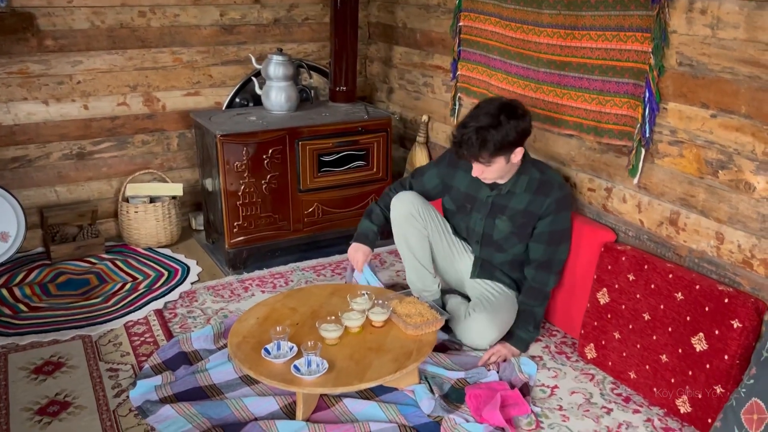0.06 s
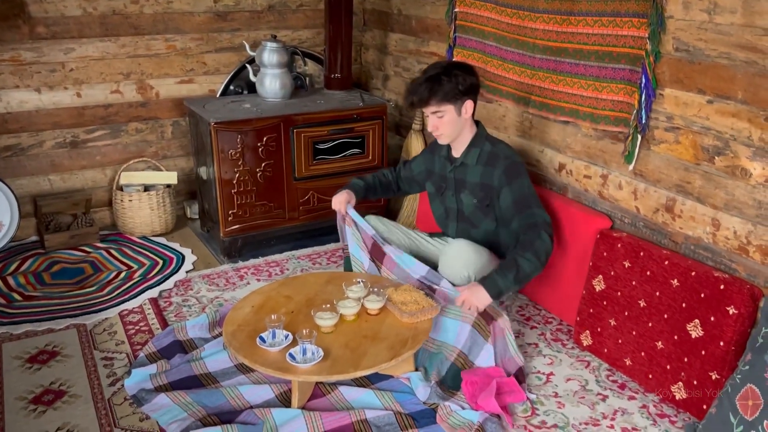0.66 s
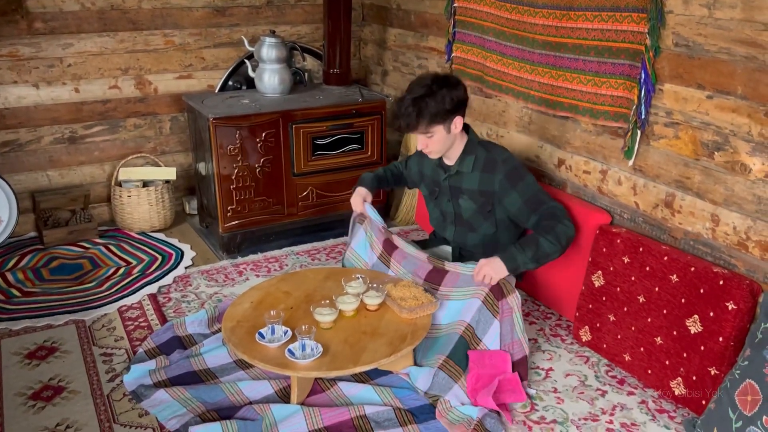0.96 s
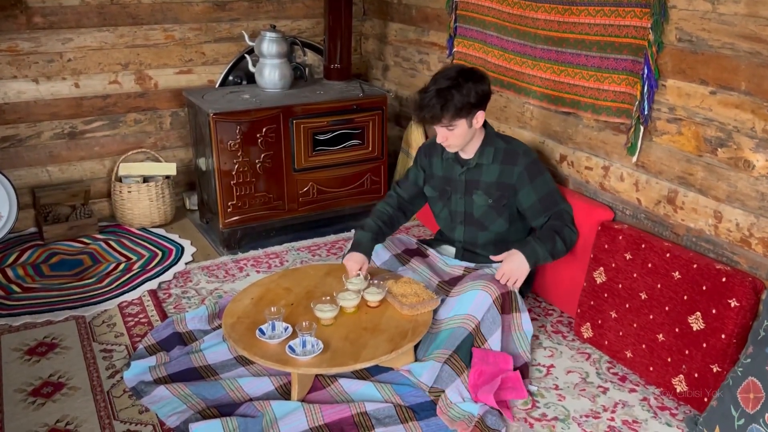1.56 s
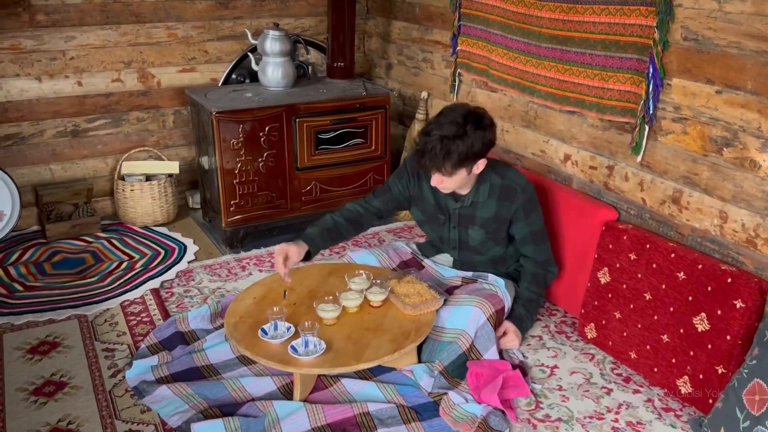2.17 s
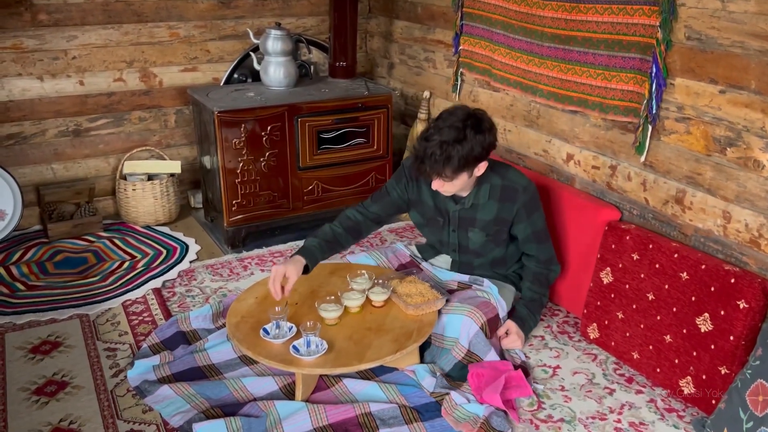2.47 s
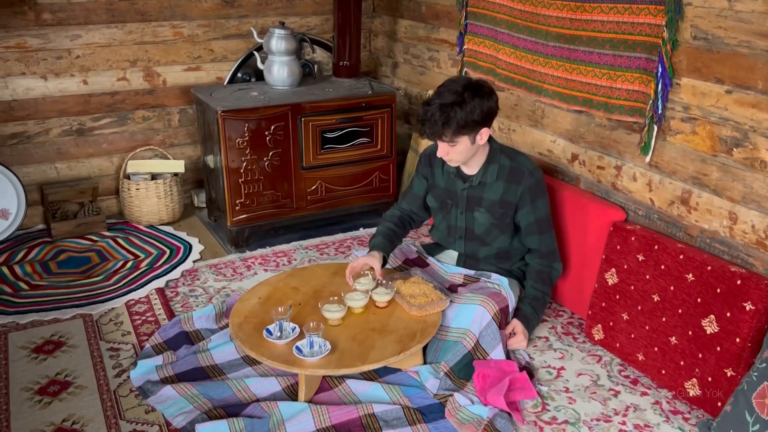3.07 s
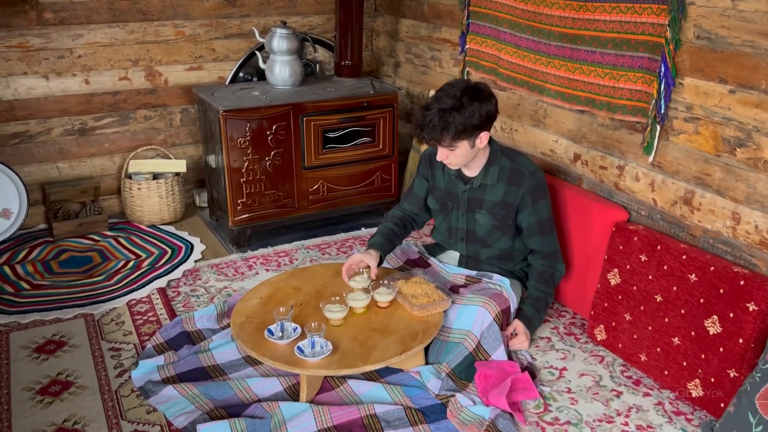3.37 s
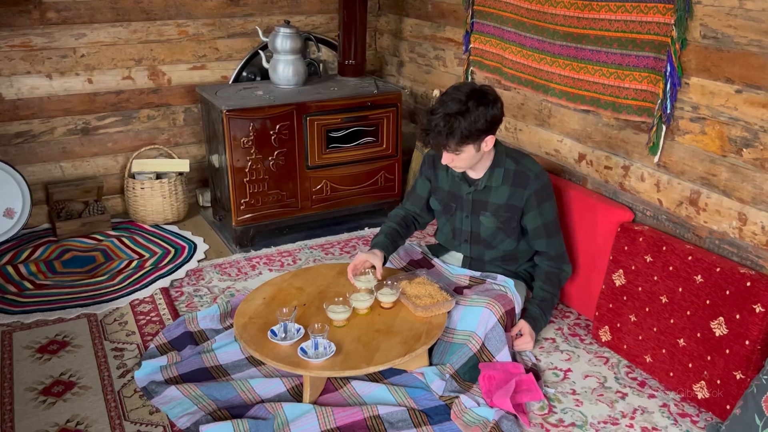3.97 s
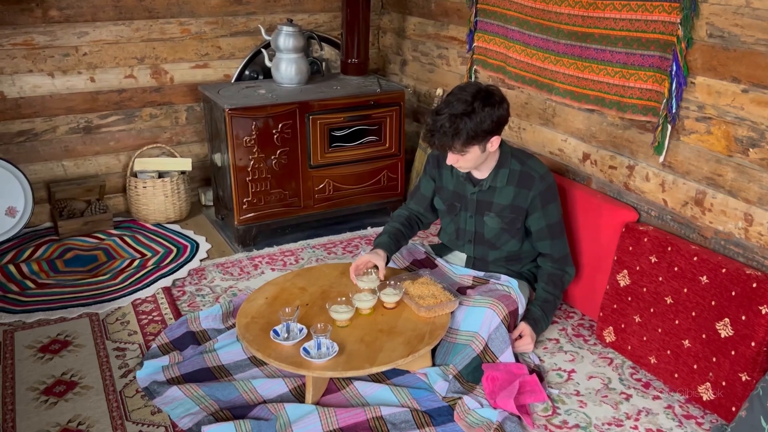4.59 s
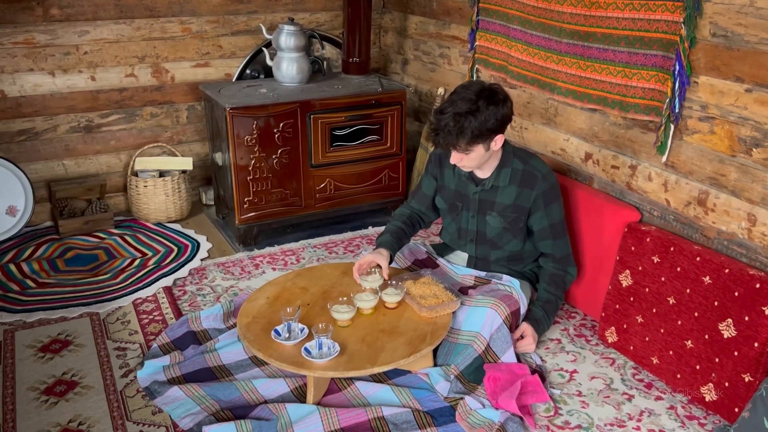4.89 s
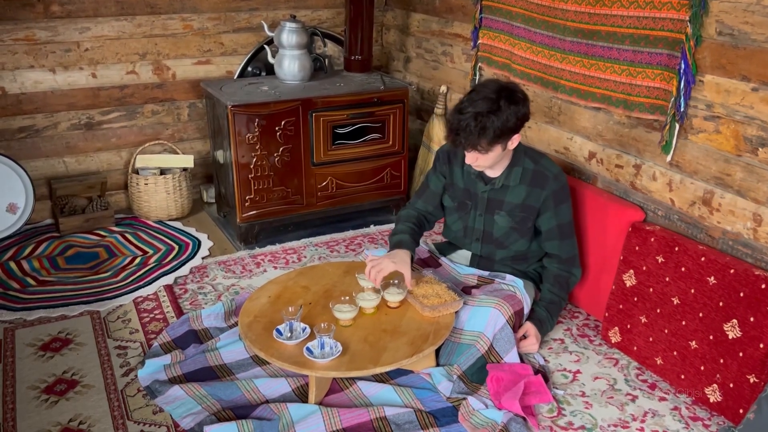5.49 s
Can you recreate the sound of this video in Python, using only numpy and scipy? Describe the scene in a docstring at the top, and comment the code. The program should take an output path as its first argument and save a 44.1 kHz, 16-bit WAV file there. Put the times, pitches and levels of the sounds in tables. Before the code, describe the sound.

A cloth is drawn up with a soft rustle and low rumble, and fingertips scuff a wooden table. A thin glass rattles briefly on a saucer and settles. Light bumps lead into four sharp, evenly spaced knocks on the tabletop, the loudest sounds, each with a hollow wooden ring and a tiny jingle of glass. It is heard through a phone a few metres off in a small, quiet timber room.

```python
"""Tea glass and knocks on a low table

In a carpeted timber room someone draws a cloth over his knees and reaches out, sleeve and fingers
rubbing on the wood. A tea glass lands on its saucer, hops and rocks to rest. Something small and hard
is nudged, then knocked four times on the table: each knock rings the top and sets the glassware
chattering. All is heard through a phone's two microphone ports, a few metres away."""
import sys
import numpy as np
from scipy import signal
from scipy.fft import rfft, irfft, next_fast_len
from scipy.io import wavfile

SR = 44100
rng = np.random.default_rng(int(sys.argv[2]) if len(sys.argv) > 2 else 0)


def to_wav(s):
    """Save 16-bit WAV."""
    ch = np.atleast_2d(s).T  # columns
    pcm = np.round(np.clip(ch, -1, 1) * 32767)  # PCM
    wavfile.write(sys.argv[1], SR, pcm.astype(np.int16))


N = 244314
TIME = np.arange(N) / SR
AGE = np.arange(SR // 3) / SR   # seconds since a contact

# blows on the table: t/s, level/dB, contact cut-off/Hz, f the spot favours/Hz, its boost/dB, click/dB
BLOWS = [(2.195, -38.5, 1250, 700, -1, -15), (3.076, -40, 520, 432, 5, -24),
         (3.269, -32.5, 920, 880, -2.5, -19), (3.362, -26.5, 1100, 890, 3, -24),
         (3.566, -35.5, 846, 430, 14, -31), (3.643, -39, 1690, 900, 3, -11),
         (3.748, -35, 900, 415, 14, -18.5), (3.958, -30.5, 2250, 1600, 8, -11),
         (3.9682, -2, 2460, 1600, -0.5, -8), (4.1412, -3, 2620, 789, 4.5, -11),
         (4.3024, -2, 2900, 2150, 0, -11), (4.455, -6.5, 1008, 865, 0, -18.5),
         (4.871, -35.5, 1300, 636, 2.5, -17)]
# hops of the glass on its saucer: t/s, glass/dB, saucer/dB, glass tilt/(dB per octave), crack/dB
HOPS = [(2.450, 2.5, -4, 7, -26), (2.49, 1, -8, 2.5, -23.5), (2.519, 4, -35, 7.5, -34),
        (2.531, -3, -6, 7, -39), (2.569, 0.5, -6, 3.5, -36), (2.621, -5, -18, 7, -44),
        (2.64, -3, -23, -4, -45.5), (2.663, -6.5, -24, -7, -42.5), (2.707, -6, -18, -2, -42),
        (2.755, -13, -22, -1, -44)]
# modes of the table top: f/Hz, level/dB, t60/s, lead of the left side/rad
TOP_MODES = [(274, -4, 0.17, 0.2), (307, -12, 0.14, 0.1), (395, -5, 0.12, 0.2), (430, -3, 0.15, -0.1),
             (733, -0.5, 0.17, -0.2), (778, -2, 0.14, -0.1), (832, 1.5, 0.21, 0.1), (883, -1.5, 0.24, 0.3),
             (985, -4, 0.16, -1), (1023, 0, 0.15, 0.8), (1085, 0, 0.18, 0.7), (1225, -7, 0.17, 2),
             (1311, -1, 0.19, 2), (1406, 0.5, 0.15, -0.9), (1540, -6, 0.15, 0), (1629, -2, 0.16, -1.5),
             (1720, -2.5, 0.14, 0.3), (2300, -11, 0.13, 0), (2755, -11, 0.15, 0.7), (3145, -4, 0.15, 0.6)]
# how alike diffuse sound is at the two ports: f/Hz, correlation
COHERENCE = [(60, 1), (300, 0.85), (650, 0.49), (1300, 0.017), (2500, 0.8), (5000, 0.34), (7000, 0.89),
             (15000, 1)]


def from_db(db):
    """Decibels to gain."""
    return 10 ** (np.asarray(db) / 20)


def rms_one(x):
    """Scale to rms 1."""
    return x / np.sqrt(np.mean(x ** 2) + 1e-20)


def at_hz(points, hz):
    """Read a table on a log-frequency axis."""
    knots, values = np.transpose(points)
    return np.interp(np.log(np.maximum(hz, 1)), np.log(knots), values)


def add(track, s, sound):
    """Mix a sound into a track at time s."""
    start = int(s * SR)
    track[..., start:start + sound.shape[-1]] += sound[..., :N - start]


def drift(rate_hz):
    """A random wander of spread about 1."""
    knots = rng.standard_normal(2000)
    return np.interp(TIME * rate_hz, np.arange(len(knots)), knots)


def dying(t60):
    """Exponential decay that loses 60 dB in t60 seconds."""
    return from_db(-60 * AGE / t60)


def soften(x, cut_hz, order=4):
    """A soft contact excites little above its cut-off."""
    return signal.sosfilt(signal.butter(order, cut_hz, fs=SR, output="sos"), x)


def diffuse(colour_db, size=len(AGE)):
    """Stereo noise of rms 1 as the two ports hear it, coloured by a function of Hz."""
    hz = np.fft.rfftfreq(size, 1 / SR)
    alike = np.clip(at_hz(COHERENCE, hz), -.99, .99)
    mid, side = rfft(rng.standard_normal((2, size)))
    pair = np.sqrt(1 + alike) * mid + np.sqrt(1 - alike) * side * [[1], [-1]]
    return rms_one(irfft(pair * from_db(colour_db(hz)), size))


def steady(spectrum):
    """A bed of diffuse noise as long as the scene."""
    return diffuse(lambda hz: at_hz(spectrum, hz), size=next_fast_len(N))[:, :N]


def swelling(hz, db, t60, rise_s):
    """A mode that takes a moment to build up, as a complex tone."""
    swell = (1 - np.exp(-(AGE / rise_s) ** 3)) * from_db(30 * rise_s / t60)
    return from_db(db) * swell * dying(t60) * np.exp(2j * np.pi * hz * AGE)


def beating(hz, spread_hz=15):
    """A close neighbour beats against a mode; the ports agree on the beat where they are coherent."""
    apart_hz = rng.normal(0, spread_hz)
    turns = rng.random() + rng.random((2, 1)) * (1 - at_hz(COHERENCE, hz))
    return 1 + np.exp(2j * np.pi * (turns + apart_hz * AGE))


def ring(modes, times, levels_db, tilts=0, pivot_hz=1, damping=1, vary_db=0.5):
    """Contacts strike every mode, each with its own strength; damping divides the ring time."""
    onsets = (times * SR).astype(int) - int(times.min() * SR)
    out = np.zeros(onsets.max() + len(AGE))
    for hz, db, t60 in modes:
        strike_db = db + levels_db + tilts * np.log2(hz / pivot_hz) + rng.normal(0, vary_db, len(times))
        strikes = np.full(len(out), 1e-18)
        strikes[onsets] = from_db(strike_db) * rng.choice([-1, 1], len(times))
        radius, angle = from_db(-60 * damping / (t60 * SR)), 2 * np.pi * hz / SR
        out += signal.lfilter([0, np.sin(angle)], [1, -2 * radius * np.cos(angle), radius ** 2], strikes)
    return out


def room(x, wet_db=8.5, body_t60=0.115, treble_t60=0.08, split_hz=10400):
    """Direct sound and a short, dense tail from the timber walls; the high treble dies first."""
    noise = diffuse(np.zeros_like)
    hz = np.fft.rfftfreq(len(AGE), 1 / SR)
    body = irfft(rfft(noise) / (1 + (hz / split_hz) ** 10), len(AGE))
    tail = (body * dying(body_t60) + (noise - body) * dying(treble_t60)) * (1 - np.exp(-AGE / 0.0016))
    response = from_db(wet_db) * tail / np.sqrt(np.sum(tail ** 2) / 2)
    response[:, 0] += 1
    return signal.fftconvolve(x[None], response, axes=1)


def room_air(level_db=-55):
    """The still air of the room: a low, even hush."""
    # room tone: f/Hz, density/dB
    hush = [(20, -12), (35, -2.5), (55, -8), (100, -2.5), (300, -22), (1000, -25), (2500, -40),
            (4000, -34.5), (5600, -45.5), (7500, -40), (13000, -49), (16000, -64)]
    return from_db(level_db) * steady(hush)


def cloth(rumble_db=-53.5, heave_db=7, heave_s=0.31, rest_db=-11.5, stop_s=0.071, settle_s=10):
    """The cloth is drawn up with a low heave and a dry rustle, then the body settles."""
    # pull on the cloth, heard as rustle: t/s, level/dB
    pull = [(0.0, -55.5), (0.38, -65.5), (0.47, -58), (0.62, -61), (1.112, -71), (1.458, -69), (1.55, -59)]
    # rubbing fabric: f/Hz, density/dB
    fabric = [(150, -18.5), (300, -14.5), (700, -0.5), (2000, -6), (4000, -17), (14000, -35.5)]
    # low rumble of the moving body: f/Hz, density/dB
    body = [(20, -15), (55, 13), (100, -0.5), (180, -18), (300, -11), (600, -39.5)]
    times, pull_db = np.transpose(pull)
    resting_s = np.maximum(TIME - times[-1], 0)
    rumble = from_db(rumble_db + heave_db * np.exp(-TIME / heave_s)) * steady(body)
    rustle_db = np.interp(TIME, times, pull_db) + rest_db * (1 - np.exp(-resting_s / stop_s))
    grain_db = 2 * drift(rate_hz=47) - 1
    rustle = from_db(rustle_db + grain_db) * steady(fabric)
    return np.exp(-resting_s / settle_s) * (rumble + rustle)


def brushes(width_octaves=0.99, top_ratio=0.87, grain_db=1.0):
    """Sleeve and skin swish past: broad humps of grainy friction noise."""
    # swishes: peak t/s, level/dB, rise/s, centre f/Hz
    swishes = [(0.044, -49, 0.066, 335), (0.21, -62.5, 0.054, 3260), (0.685, -63, 0.027, 2600),
               (0.865, -64, 0.0082, 5200), (1.185, -59, 0.057, 2310), (3.644, -52.5, 0.037, 1160),
               (4.67, -55, 0.05, 1005), (4.756, -52, 0.017, 1250)]
    out = np.zeros((2, N))
    for s, db, rise_s, centre_hz in swishes:
        skirts = lambda hz: 1 + (np.log2((hz + 1) / centre_hz) / width_octaves) ** 2 / 2
        top_loss = lambda hz: 1 + (hz / centre_hz / top_ratio) ** 2
        friction = diffuse(lambda hz: -20 * np.log10(skirts(hz) * top_loss(hz)))
        decay_s = rise_s + 0.0075   # a slow swell also fades slowly
        lead_s = min(s, .13)
        envelope = np.exp(-np.maximum((lead_s - AGE) / rise_s, (AGE - lead_s) / decay_s))
        add(out, s - lead_s, from_db(db) * friction * envelope)
    return out * from_db(grain_db * drift(rate_hz=140))


def finger_slips(grit_t60=0.099, tail_db=-7, tail_t60=0.24, ring_hz=1740, spread_hz=50):
    """Fingers catch and slip: each time a burst of grit with a room tail, and a short ring of wood."""
    # slips: t/s, level/dB, cut-off/Hz, ring/dB
    slips = [(1.583, -53.5, 2700, 0), (1.594, -47, 4520, -11), (1.612, -45.5, 7000, 2.5),
             (1.627, -50.5, 4520, -13), (1.7085, -48.5, 2770, -5), (1.714, -44, 2290, -7)]
    # skin on wood: f/Hz, density/dB
    grit = [(200, -10), (1200, -4), (1750, 0), (2100, -5), (2700, -4), (3600, -13), (7500, -16),
            (12000, -34)]
    envelope = dying(grit_t60) + from_db(tail_db) * dying(tail_t60)
    out = np.zeros((2, N))
    for s, db, cut_hz, ring_db in slips:
        burst = envelope * diffuse(lambda hz: at_hz(grit, hz))
        note = swelling(rng.normal(ring_hz, spread_hz), ring_db, t60=0.16, rise_s=0.00082).imag
        add(out, s, from_db(db) * soften(burst + note, cut_hz, order=2))
    return out


def glass(times, levels_db, tilts, ring_db=-32.5, ring_t60=0.0593, tick_db=-34, tick_t60=0.039):
    """Thin glass rings briefly; each contact also grates for a moment, coloured by the same modes."""
    # modes of the tea glass: f/Hz, level/dB
    partials = [(7206, -10), (7578, -9), (7684, -7), (7760, -7), (7865, -7), (7950, -9), (8130, -12),
                (9211, -14), (9604, -5), (12300, -11), (12787, -4), (14452, -6.5), (14750, -10),
                (15057, -4.5), (15510, -12)]
    modes = [(hz, db, ring_t60) for hz, db in partials]
    out = from_db(ring_db) * ring(modes, times, levels_db, tilts, pivot_hz=10100)
    size, width_hz, floor_db = SR // 16, 100, -40
    hz = np.fft.rfftfreq(size, 1 / SR)
    humps = sum(from_db(2 * db) / (1 + ((hz - centre) / width_hz) ** 2) ** 2 for centre, db in partials)
    colour = np.sqrt(humps + from_db(2 * floor_db) * hz / (hz + 1500))
    for s, db, tilt in zip(times, levels_db, tilts):
        brightness = from_db(tilt * np.log2(np.maximum(hz, 6000) / 9600))
        tick = irfft(rfft(rng.standard_normal(size)) * colour * brightness, size)
        add(out, s - times.min(), from_db(db + tick_db) * rms_one(tick) * dying(tick_t60)[:size])
    return out


def chatter(peak_db=-14, loosen_db=1, bounce_s=0.012, swell_s=0.019, fade_db_per_s=370, count=8):
    """Each hard knock throws the glassware into a quick, uneven run of bounces that swells and dies."""
    knocks = [s for s, db, *_ in BLOWS if db > -15]
    out = np.zeros((2, N))
    for k, s in enumerate(knocks):
        delays = bounce_s * (np.arange(count) + rng.random(count))
        arc_db = peak_db + loosen_db * k - fade_db_per_s * abs(delays - swell_s)
        levels_db = arc_db + rng.normal(0, 2, count)
        add(out, s + delays[0], room(glass(delays, levels_db, tilts=rng.normal(-3, 2, count))))
    return out


def glass_contacts(rebound_s=0.01, rebound_db=-4.5, rock_at_s=2.5974, gap_s=0.027, shrink=0.97, count=10):
    """Each hop rebounds once; then the glass rocks on its rim, unevenly quickening and fading."""
    hops = np.array(HOPS)[:, :-1]
    rebounds = hops + [rebound_s, rebound_db, rebound_db, 0]
    gaps = gap_s * shrink ** np.arange(count) * (1 + 0.12 * rng.standard_normal(count))
    since = np.cumsum(gaps) - gaps[0]
    spent = (since / since[-1]) ** 2.3
    glass_db = -3.5 - 21 * spent
    saucer_db = -19.5 - 17.5 * spent
    tilts = -0.5 - 8 * spent   # softer contacts are duller
    rocks = np.column_stack([rock_at_s + since, glass_db, saucer_db, tilts])
    return np.vstack([hops, rebounds, rocks])


def patter(times, levels_db, modes_db=-55, dense_db=-44, dense_t60=0.15, spot_db=12, width_hz=22):
    """The saucer passes each contact to the table top, which answers with its modes and a dense bed."""
    # wood between the modes: f/Hz, density/dB
    bed = [(150, -4.5), (300, 6.5), (680, -2.5), (1100, -1.5), (2800, -8), (6000, -28.5)]
    favour = lambda hz: sum(spot_db / (1 + ((hz - spot_hz) / width_hz) ** 2) for spot_hz in (431, 960))
    modes = [(hz, db + favour(hz), t60) for hz, db, t60, _ in TOP_MODES]
    out = np.zeros((2, N))
    add(out, times.min(), room(ring(modes, times, levels_db + modes_db, damping=0.83), wet_db=-6))
    for s, db in zip(times, levels_db):
        add(out, s, from_db(db + dense_db) * dying(dense_t60) * diffuse(lambda hz: at_hz(bed, hz)))
    return out


def rocking_glass(saucer_db=-26, crack_t60=0.012):
    """The glass lands, hops with sharp cracks and rocks to rest on a saucer damped by its touch."""
    # modes of the saucer: f/Hz, level/dB, undamped t60/s
    saucer_modes = [(3226, 3, 0.35), (4300, -11, 0.22), (5141, -12, 0.28), (6374, -2.5, 0.25),
                    (6648, -16, 0.25), (11843, -16, 0.22)]
    # bright crack of a hop: f/Hz, density/dB
    crack_colour = [(2000, -37), (6500, -37), (9400, -1), (15500, 3)]
    times, glass_db, foot_db, tilts = np.transpose(glass_contacts())
    out = patter(times, glass_db)
    saucer = from_db(saucer_db) * ring(saucer_modes, times, foot_db, tilts=4, pivot_hz=5100, damping=1.9)
    add(out, times.min(), room(glass(times, glass_db, tilts)) + room(saucer, wet_db=-3))
    for s, *_, crack_db in HOPS:
        crack = diffuse(lambda hz: at_hz(crack_colour, hz))[0] * dying(crack_t60)
        add(out, s, from_db(crack_db) * room(crack, wet_db=-7))
    return out


def table_thumps(level_db=-20, rise_cycles=1.8, follow=0.64):
    """Each blow bounces the whole table on its legs and the floor."""
    # bounce modes: f/Hz, level/dB, t60/s
    bounce = [(52.3, -4, 0.3), (48.6, -6, 0.49), (90, -2, 0.15), (128, -6.5, 0.15)]
    thump = sum(swelling(hz, db, t60, rise_cycles / hz).imag for hz, db, t60 in bounce)
    out = np.zeros((2, N))
    for s, db, *_ in BLOWS:   # a gentle push loses less in weight than in ring
        add(out, s, from_db(level_db + follow * db) * thump)
    return out


def top_ring(strengths, pan_db=2, late_s=0.0048, late_below_hz=410):
    """The table top's modes build up and beat, anew at each blow; the low ones speak late."""
    sides = np.array([[.5], [-.5]])
    out = np.zeros((2, len(AGE)))
    for k, (hz, db, t60, lead) in enumerate(TOP_MODES):
        rise_s = 1 / hz + late_s / (1 + (hz / late_below_hz) ** 10)
        placement = from_db(pan_db * sides) * np.exp(1j * lead * sides)
        polarity = (-1) ** (k // 2)
        out += polarity * strengths[k] * (swelling(hz, db, t60, rise_s) * placement * beating(hz)).imag
    return out


def table_blows(modes_db=-19, vary_db=2, wood_t60=0.24, click_t60=0.22):
    """Nudges and knocks ring the top's modes, a dense bed of higher ones, a click and a late boom."""
    # dense higher modes of the wood: f/Hz, density/dB
    wood_colour = [(220, -27.5), (340, -21), (650, -7), (1500, -9.5), (1900, -14), (2300, -15), (3100, -26),
                   (5500, -33)]
    # click of a hard edge: f/Hz, density/dB
    click_colour = [(500, -27.5), (2400, -18.5), (3800, -31), (6000, -43.5), (15000, -68.5)]
    # boom that builds up between table and floor: f/Hz, density/dB
    boom_colour = [(110, -8), (215, -27.5), (290, -0.5), (340, -13), (410, 1.5), (540, -21), (900, -32.5)]
    # the glass's first drop strikes the table through the saucer; columns as in BLOWS
    landing = (HOPS[0][0], -21, 2301, 400.5, 10.5, -3.5)
    attack = 1 - np.exp(-AGE / 0.0012)
    snap = from_db(-12) * dying(t60=0.022)
    envelope = lambda t60: attack * (snap + from_db(-17) * dying(t60))
    boom_swell = abs(swelling(hz=0, db=-21, t60=0.19, rise_s=0.0048))
    mode_hz = np.array(TOP_MODES)[:, 0]
    out = np.zeros((2, N))
    for s, db, contact_hz, spot_hz, spot_db, click_db in [*BLOWS, landing]:
        favour = lambda hz: spot_db / (1 + (3 * np.log2((hz + 1) / spot_hz)) ** 2)
        bed = lambda colour: diffuse(lambda hz: at_hz(colour, hz) + favour(hz))
        modes = top_ring(from_db(modes_db + favour(mode_hz) + rng.normal(0, vary_db, len(mode_hz))))
        wood = envelope(wood_t60) * bed(wood_colour)
        boom = boom_swell * bed(boom_colour)
        click = from_db(click_db) * envelope(click_t60) * bed(click_colour)
        add(out, s, from_db(db) * (soften(modes + wood + boom, contact_hz) + click))
    return out


def scene():
    """Table, glassware, fingers and cloth over the quiet air of the room."""
    table = table_blows() + table_thumps()
    glassware = rocking_glass() + chatter()
    person = finger_slips() + brushes() + cloth()
    return table + glassware + person + room_air()


def record(dry, low_cut_hz=33, high_cut_hz=15900):
    """The two ports turn the treble apart in phase; the deepest bass and the top are cut."""
    # phase between the ports: f/Hz, lead of the left side/rad
    port_phase = [(2200, 0), (3200, .6), (6400, .4), (8000, -1), (9600, -3), (12000, -5.7), (15000, -8.4)]
    size = next_fast_len(N + SR // 10)
    lead = at_hz(port_phase, np.fft.rfftfreq(size, 1 / SR))
    pair = irfft(rfft(dry, size) * np.exp(1j * lead * np.array([[1], [0]])), size)[:, :N]
    pair = signal.sosfilt(signal.butter(2, low_cut_hz, "high", fs=SR, output="sos"), pair)
    return signal.sosfilt(signal.ellip(10, .3, 80, high_cut_hz, fs=SR, output="sos"), pair)


dry = scene()
out = record(dry)
to_wav(out)
```